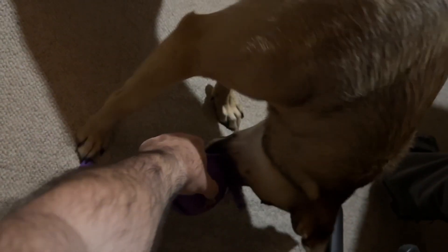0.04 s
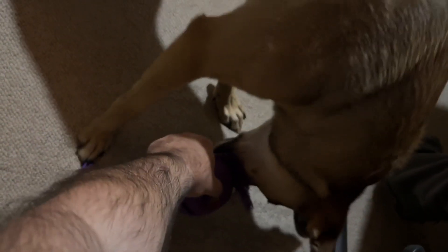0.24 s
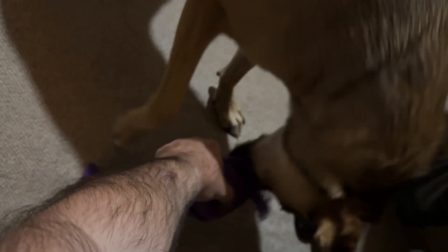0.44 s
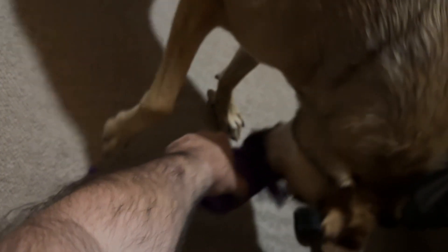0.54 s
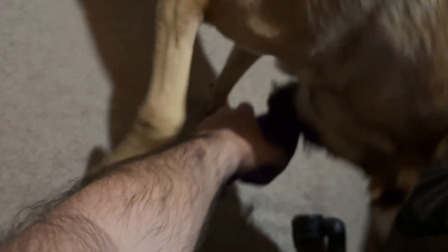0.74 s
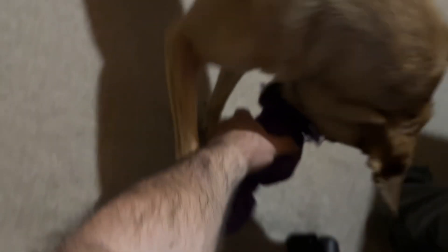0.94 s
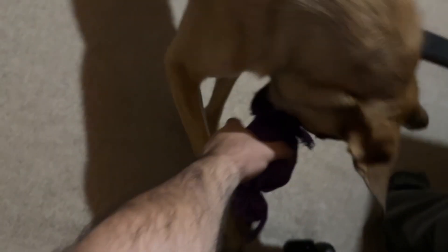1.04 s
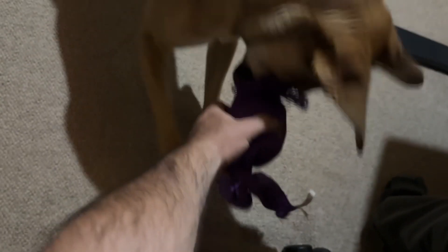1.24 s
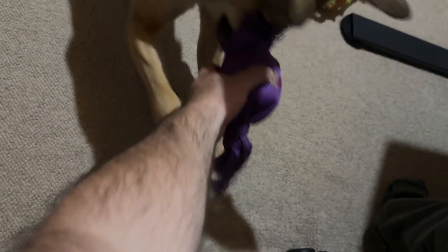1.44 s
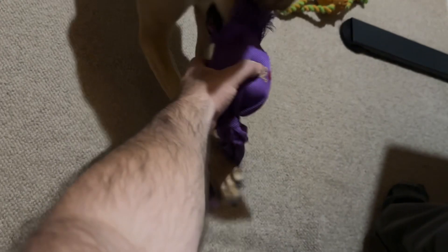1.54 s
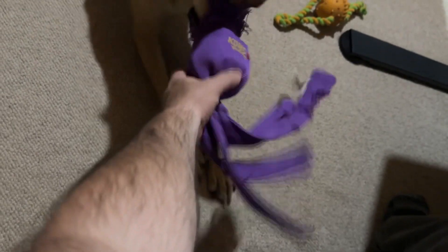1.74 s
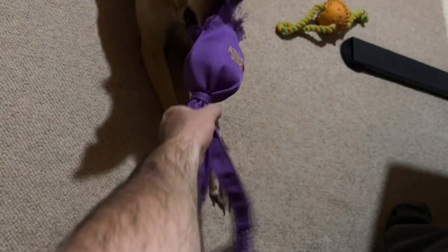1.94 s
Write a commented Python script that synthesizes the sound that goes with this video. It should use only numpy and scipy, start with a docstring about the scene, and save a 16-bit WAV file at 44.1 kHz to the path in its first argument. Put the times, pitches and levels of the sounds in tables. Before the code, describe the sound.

A rubber dog toy gives one short, reedy squeak near the start, with faint air hiss around it; then soft fabric rustling, carpet scuffs, a dull paw thump and tiny ticks, close handheld microphone, carpeted office.

```python
"""A dull paw thump and a low room rumble come first, then a rubber toy gives one short two-reed squeak.
A hand and a dog tug at the toy in a carpeted office, close to a handheld camera.
The reeds are stacks of overtones on gliding pitches, with echoes and a short room tail. Cloth, fur,
carpet and leaking air are coloured noise; thumps and small ticks are dying sine tones."""
import sys
import numpy as np
from scipy import signal
from scipy.fft import rfft, irfft
from scipy.io import wavfile
from scipy.ndimage import uniform_filter1d

SR = 44100
rng = np.random.default_rng(int(sys.argv[2]) if len(sys.argv) > 2 else 0)


def generate_wav(sig):
    """Save sig (samples, or channels by samples) to the path in sys.argv[1] as 16-bit PCM at SR."""
    pcm = np.round(np.clip(np.atleast_2d(sig).T, -1, 1) * 32767).astype(np.int16)
    wavfile.write(sys.argv[1], SR, pcm)


N = 88200  # samples: two seconds
TIME_S = np.arange(N) / SR
BINS_HZ = np.fft.rfftfreq(N, 1 / SR)


def undb(db):
    """Turn dB into a gain."""
    return 10 ** (np.asarray(db) / 20)


def curve(table, col=1):
    """Read one column of a time table at every sample, with straight lines between the rows."""
    table = np.array(table)
    return np.interp(TIME_S, table[:, 0], table[:, col])


def over_hz(table):
    """Read a (frequency, value) table at every FFT bin, straight on a log frequency axis."""
    table = np.array(table, float)
    return np.interp(np.log(BINS_HZ + 1), np.log(table[:, 0] + 1), table[:, 1])


def resonance(hz, width):
    """A bell-shaped peak of height 1 over frequency, down to half at width / 2 on either side."""
    return 1 / (1 + (2 * (BINS_HZ - hz) / width) ** 2)


def walk(rate):
    """Smooth random wandering with spread near 1, taking about `rate` new values per second."""
    hold = int(SR / rate)
    steps = np.repeat(rng.standard_normal(N // hold + 1), hold)
    return 1.3 * uniform_filter1d(uniform_filter1d(steps, hold), hold)[:N]


# how much of the sound differs between the ears: (frequency [Hz], side against mid [dB])
SIDE_DB = [(60, -15), (250, -8.5), (1000, -6), (3000, -1.5), (8000, 1.5), (15000, -5)]
# which ear is louder: (frequency [Hz], left minus right [dB])
LEAN = [(60, -1), (110, 3), (200, 0), (380, -0.5), (700, 1.5), (1290, -0.5), (2380, -4.5), (4400, 5.5),
        (8120, 4.0), (15000, -3)]
GRAINS_PER_S = 300  # average count


def diffuse(colour, grainy_db, flicker_db):
    """Stereo noise of rms 1: random grains roughen it, each octave flickers alone, bass is nearly mono."""
    sizes = undb(grainy_db * rng.exponential(size=N).clip(0, 3.5))
    grains = sizes * (rng.random(N) < GRAINS_PER_S / SR)
    grain_power = uniform_filter1d(grains ** 2, size=60).clip(0) * SR / GRAINS_PER_S
    strength = 6.0 + np.sqrt(grain_power) * (grainy_db > 0)  # steady part plus grains
    mid, side = rfft(rng.standard_normal((2, N)) * strength) * undb(over_hz(colour))
    side = side * undb(over_hz(SIDE_DB))
    pair = np.array([mid + side, mid - side]) * undb(np.outer([.5, -.5], over_hz(LEAN)))
    octave = np.log2(BINS_HZ + 1)
    out = 0
    for centre in range(4, 15):
        band = irfft(pair * np.clip(1 - abs(octave - centre), 0, 1), N)
        out = out + band * undb(flicker_db * walk(12.34))
    return out / np.sqrt(np.mean(out ** 2))


def ring(start, hz, db, t60, rise):
    """One struck tone: it swells over `rise` seconds while fading 60 dB every `t60` seconds."""
    t = (TIME_S - start).clip(0)
    return undb(db - 60 * t / t60) * (1 - np.exp(-t / rise)) * np.sin(2 * np.pi * hz * t)


# colour of the low rumble: (frequency [Hz], relative level [dB per Hz])
RUMBLE = [(15, -49), (25, -19), (38, -12), (59, -5), (82, -4), (176, -7.5), (290, -20.5), (537, -23),
          (637, -28.5), (1140, -34.5), (1500, -55.5), (1950, -59.5), (3300, -120)]
RUMBLE_DB = -57.5  # rms
# narrow wavering tones of the building: (frequency [Hz], width [Hz], rms level [dB])
HUM = [(56.5, 29, -60), (171.2, 58, -70)]
# when a steady tone at the upper hum's pitch swells: (middle [s], half length [s], peak level [dB])
SWELLS = [(.41, 0.096, -61), (0.915, 0.044, -55), (1.241, .075, -53)]


def office():
    """Low rumble and two hums of narrow noise; a pure tone at the upper hum's pitch swells in and out."""
    out = undb(RUMBLE_DB) * diffuse(RUMBLE, 0, 1.5)
    for hz, width, db in HUM:
        hum = irfft(rfft(rng.standard_normal(N)) * resonance(hz, width), N)
        out = out + undb(db) * hum / hum.std()  # the same in both ears
    swell = sum(undb(db) * np.exp(-((TIME_S - middle) / half) ** 4) for middle, half, db in SWELLS)
    return out + swell * np.sin(2 * np.pi * HUM[1][0] * TIME_S)


# bright swish of fur and cloth: (time [s], rms level [dB])
SWISH = [(0, -68), (.11, -71), (.15, -57.5), (.2, -75), (.27, -48), (0.3, -66.5), (0.474, -64),
         (0.508, -71.5), (0.584, -63.5), (0.622, -70.5), (0.706, -72), (0.758, -67), (0.868, -71.5),
         (0.9, -59), (0.938, -61.5), (0.966, -65.5), (1.146, -74), (1.298, -61.5), (1.364, -67.5),
         (1.492, -60.5), (1.52, -56), (1.534, -60.5), (1.63, -62), (1.64, -54.5), (1.662, -60.5),
         (1.856, -68), (2.0, -66.5)]
# colour of the swish: (frequency [Hz], relative level [dB per Hz])
SWISH_COLOUR = [(1180, -31), (2000, -5), (2150, -9), (2320, -6.5), (3080, -8), (3900, -9.5), (4670, -6.5),
                (6540, -7), (8390, -8), (9410, -7.5), (10000, -6.5), (13000, -48.5), (22000, -120)]
# the topmost hiss: (time [s], rms level [dB])
SHEEN = [(0, -86), (.11, -88), (.15, -73), (.2, -74), (.28, -87), (.4, -84), (.49, -97), (.575, -75),
         (.63, -89), (.8, -81), (.86, -75.5), (.88, -71), (.92, -60), (.985, -79.5), (1.13, -89.5),
         (1.32, -73), (1.36, -77), (1.44, -71), (1.52, -63), (1.57, -66), (1.77, -75), (1.854, -88),
         (1.886, -72), (1.94, -82), (2, -84)]
# colour of the topmost hiss: (frequency [Hz], relative level [dB per Hz])
SHEEN_COLOUR = [(11000, -80), (12300, -12), (13000, -3), (14500, 0), (16000, -1)]


def swish():
    """Cloth and fur rubbing: slightly grainy bright noise, with a separate layer for the very top."""
    rustle = undb(curve(SWISH)) * diffuse(SWISH_COLOUR, 1.5, 1.1)
    sheen = undb(curve(SHEEN)) * diffuse(SHEEN_COLOUR, 1.5, 2.1)
    return rustle + sheen


# dull scuffing on the carpet: (time [s], rms level before the resonances lift it [dB])
SCUFF = [(0, -66), (.12, -75.5), (.2, -57.5), (.32, -64.5), (.366, -62.5), (.538, -75), (.58, -66.5),
         (.65, -88), (.756, -73), (.868, -80.5), (.98, -67), (1.17, -81.5), (1.195, -67), (1.26, -72),
         (1.34, -60.5), (1.4, -66), (1.45, -56.5), (1.51, -53), (1.6, -58.5), (1.66, -55.5), (1.76, -58),
         (1.86, -61.5), (2, -62.5)]
# colour of the scuffing before that lift: (frequency [Hz], relative level [dB per Hz])
SCUFF_COLOUR = [(150, -35), (250, 5.5), (274, -1), (949, -10), (1310, -12), (1700, -13), (2210, -17),
                (4000, -34.5), (5200, -50), (8800, -120)]
# resonances of the rubbed toy: (frequency [Hz], width [Hz], lift [dB])
SCUFF_RINGS = [(1350, 300, 8), (2250, 220, 8), (3000, 700, 10)]
GRAIN_DB = 5  # how strongly grain sizes vary


def scuff():
    """Grainy rubbing noise, made louder around the toy's own resonances."""
    lift_db = sum(db * resonance(hz, width) for hz, width, db in SCUFF_RINGS)
    rubbing = diffuse(SCUFF_COLOUR, GRAIN_DB, 1.8)
    return undb(curve(SCUFF)) * irfft(rfft(rubbing) * undb(lift_db), N)


# air leaking out before the squeak and drawn back in after it: (time [s], rms level [dB])
LEAK = [(.1, -97), (.14, -65), (.19, -58), (.28, -68), (.36, -62.5), (.46, -67.5), (.51, -89)]
# bands where the leaking air hisses: (frequency [Hz], width [Hz], relative level [dB])
LEAK_BANDS = [(8400, 2400, -3), (3430, 780, -2.5)]


def leak():
    """Air hissing through the squeaker's narrow neck: almost even noise shaped into two broad bands."""
    shape = sum(undb(db) * resonance(hz, width) for hz, width, db in LEAK_BANDS)
    hiss = irfft(rfft(diffuse([(100, 0.002), (16000, 0.012)], 0, 1.5)) * shape, N)
    return undb(curve(LEAK)) * hiss / hiss.std()


# paw thumps: (time [s], strength [dB], change per octave above the lowest floor tone [dB])
THUMPS = [(.004, -40.5, -2.5), (1.634, -33.5, 0)]
# tones of the floor: (frequency [Hz], level added to the thump's [dB], 60 dB fade time [s], delay [s])
FLOOR = [(56.6, 0.5, 0.23, 0.01766), (82, 1.5, 0.16, .016), (164, -10.5, 0.18, 0.016),
         (284, -5.5, 0.049, .008), (428, -7, 0.051, 0.004), (680, -9, 0.022, 0.006),
         (1120, -17, 0.025, 0.0022), (2900, -18.5, 0.015, 0.0035)]
PUSH_CYCLES = 0.072  # each floor tone swells over this part of its cycle


def thumps():
    """A paw sets the floor's tones ringing: the bass arrives late and lasts longest."""
    out = np.zeros(N)
    for start, db, soft_db in THUMPS:
        for hz, share, t60, late in FLOOR:
            octaves_up = np.log2(hz / FLOOR[0][0])
            out += ring(start + late, hz, db + share + soft_db * octaves_up, t60, PUSH_CYCLES / hz)
    return out


# small ticks of claws or teeth: (time [s], strength [dB], pitch [Hz])
TICKS = [(1.005, -49, 2100), (1.105, -57, 1900), (1.6325, -41, 1000), (1.8926, -37, 1400),
         (1.9241, -33.5, 1250)]
# tones inside each tick: (multiple of the pitch, level added to the tick's [dB])
TICK_RINGS = [(1, 0), (.45, -12), (1.5, -11), (2.2, -13)]
TICK_T60_S, TICK_RISE_S = .009, .0005  # 60 dB fade time, swell time


def ticks():
    """Light knocks: a few short tones each, ringing for only a few cycles."""
    out = np.zeros(N)
    for start, db, hz in TICKS:
        for multiple, share in TICK_RINGS:
            out -= ring(start, hz * multiple, db + share, TICK_T60_S, TICK_RISE_S)
    return out


WAVER = .004  # pitch unsteadiness, as a fraction
AIR_DB = -43  # air rushing past a reed: gain on band-passed noise, on top of the reed's own course
FLUTTER_DB, FLUTTER_PER_S = 4, 140  # unevenness of overtones 5 and up (less below), new values per second
CHOKE_DB = -6  # below this level on its course a reed can shed overtones faster


def reed(course, tones, brighten, choke):
    """A buzzing reed: overtones on one pitch, the upper ones fading faster when the squeeze weakens."""
    db = uniform_filter1d(curve(course, col=2), size=100)
    pitch_hz = uniform_filter1d(curve(course), size=200) * (1 + WAVER * walk(150))
    phase = 2 * np.pi * np.cumsum(pitch_hz) / SR
    sounding = (np.arange(N) > course[0][0] * SR) & (np.arange(N) < course[-1][0] * SR)
    choked_db = choke * np.minimum(db - CHOKE_DB, 0)
    out = 0
    for k, left, right in tones:
        uneven_db = [FLUTTER_DB * min(k / 5, 1) * walk(FLUTTER_PER_S) for _ in range(2)]
        ears = undb([left + uneven_db[0], right + uneven_db[1]])
        squeeze = undb(db * (1.5 + brighten * k) + (k > 1) * choked_db)
        out = out + ears * squeeze * np.sin(k * phase)
    band = signal.butter(2, (3000, 14000), "bandpass", fs=SR, output="sos")
    air = signal.sosfilt(band, rng.standard_normal((2, N)))
    return sounding * (out + undb(AIR_DB + db) * air)


# each reed through the squeeze; every overtone multiplies this level by 1.5 + brighten * multiple:
# (time [s], pitch [Hz], level [dB])
LOW_REED = [(.176, 562.7, -33.5), (.184, 598, -18.5), (.192, 636.5, -5), (.202, 717.3, 0),
            (.214, 719.4, -1.5), (.232, 718, -0.5), (.246, 704.6, -1.5), (.258, 682, -3.5), (.268, 644, -6),
            (.274, 622, -14.5), (.285, 694, -21), (.292, 686, -43)]
HIGH_REED = [(.16, 1085, -20), (.183, 1075, -13), (.189, 1050, -7), (.1935, 985, -4.5), (.198, 893, -2),
             (.205, 900, -.5), (.213, 920, 0), (.222, 915, 0), (.234, 891, 0), (.244, 870, -.5),
             (.252, 842, -2.5), (.259, 820, -5), (.264, 870, -13), (.3, 880, -16), (.312, 880, -35)]
# overtones at the two microphone ports, before flutter: (multiple of the pitch, left [dB], right [dB])
LOW_TONES = [(1.003, -30, -22), (2.009, -34, -35), (3.014, -45, -33.5), (4.01, -39.5, -38.5),
             (4.99, -50, -36), (5.9, -45.5, -41), (7.05, -38.5, -36.5), (8.3, -43.5, -41), (8.98, -41, -35),
             (9.8, -33, -43.5), (11.09, -37, -38.5), (12.7, -33.5, -36), (13.2, -40, -36.5),
             (14.1, -47.5, -46.5), (17, -53, -52), (18, -55.5, -53.5), (19, -48.5, -52.5), (20, -59, -59),
             (21, -57.5, -59.5)]
HIGH_TONES = [(1, -30, -30), (2, -23.5, -22), (3, -29.5, -22.5), (4, -29, -26.5), (5, -34, -31.5),
              (6, -30.5, -38.5), (7, -32.5, -36.5), (8, -32.5, -31.5), (9, -27, -36), (10, -27, -26),
              (11, -44, -47), (14, -45, -43.5), (15, -50.5, -48), (16, -50, -50.5), (17, -63.5, -61.5)]
# timing difference between the ports: (frequency [Hz], phase by which left leads [radians])
PORT_PHASE = [(720, -.3), (920, .2), (1450, -1.5), (1800, .55), (2150, 1.7), (2700, .65), (3600, 2.6),
              (4500, 3.9), (5400, 5.6), (6400, 7.9), (8000, 6.6), (9100, 5.2), (11000, 3.1), (13000, 1.7),
              (14500, 0)]
# echoes from floor and furniture: (left delay [s], right delay [s], level [dB])
ECHOES = [(.0031, .0036, -25.5), (.0074, .0066, -14)]
LOW_BRIGHTEN, HIGH_BRIGHTEN = .12, .5  # extra dB lost per overtone for each dB a reed softens
HIGH_CHOKE = 1.5  # extra dB lost by the high reed's overtones per dB below CHOKE_DB
ROOM_T60_S, ROOM_DB = 0.17, -19.5  # 60 dB fade time [s], tail energy against the direct sound [dB]


def squeak():
    """Both reeds, reaching the ports at different phases, with near echoes and a short room tail."""
    low = reed(LOW_REED, LOW_TONES, LOW_BRIGHTEN, 0)
    high = reed(HIGH_REED, HIGH_TONES, HIGH_BRIGHTEN, HIGH_CHOKE)
    turn = np.exp(1j * np.outer([.5, -.5], over_hz(PORT_PHASE)))
    direct = irfft(rfft(low + high) * turn, N)
    near = 0
    for left, right, db in ECHOES:
        delayed = [np.roll(direct[0], int(left * SR)), np.roll(direct[1], int(right * SR))]
        near = near + undb(db) * np.array(delayed)
    t = np.arange(SR // 2) / SR
    tail = rng.standard_normal((2, len(t))) * undb(-60 * t / ROOM_T60_S) * (t > .008)
    tail = tail / np.sqrt(np.sum(tail ** 2, axis=1, keepdims=True))
    room = signal.fftconvolve(direct, tail, axes=1)[:, :N]
    return direct + near + undb(ROOM_DB) * room


PORT_LAG_S = .00005  # cut to whole samples


def scene():
    """Squeak over room, rustle, thumps and ticks; the right port hears all but the squeak slightly later."""
    leaning_thumps = np.outer(undb([.7, -.7]), thumps())  # a little louder on the left
    around = office() + swish() + scuff() + leak() + leaning_thumps + ticks()
    late_right = np.roll(around[1], int(PORT_LAG_S * SR))
    return squeak() + np.array([around[0], late_right])


LOW_CUT_HZ, TOP_HZ = 37, 15800  # the microphone drops deep bass; nearly nothing passes above the top
DIP_HZ, DIP_DB = (10000, 12300), -26  # sound is nearly absent in this band


def record(dry):
    """Final filters: deep bass removed, sound nearly absent from 10 to 12.3 kHz, then a steep cut-off."""
    bass_cut = signal.butter(2, LOW_CUT_HZ, "highpass", fs=SR, output="sos")
    dip_band = signal.butter(6, DIP_HZ, "bandpass", fs=SR, output="sos")
    top_cut = signal.ellip(10, .2, 80, TOP_HZ, fs=SR, output="sos")
    dry = signal.sosfilt(bass_cut, dry)
    dip = signal.sosfiltfilt(dip_band, dry)
    return signal.sosfilt(top_cut, dry - (1 - undb(DIP_DB)) * dip)


dry = scene()
out = record(dry)
generate_wav(out)
```